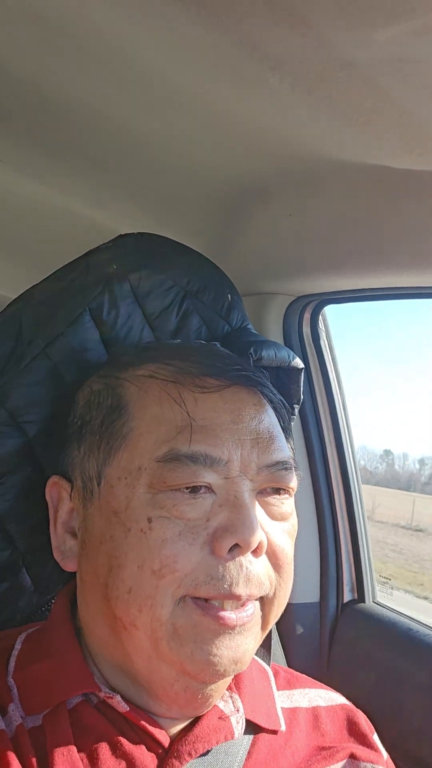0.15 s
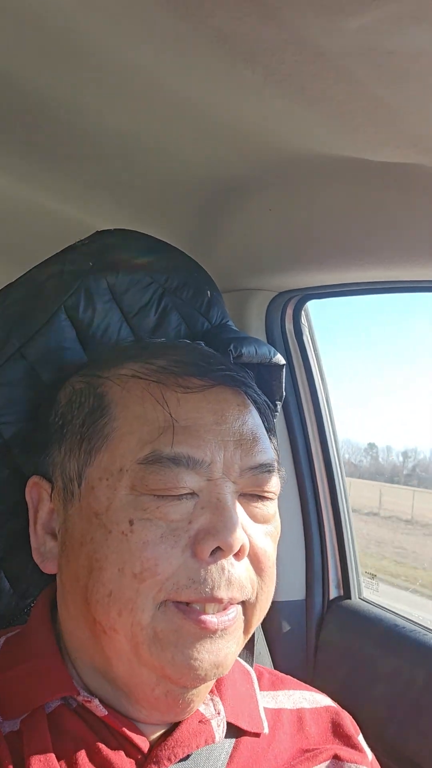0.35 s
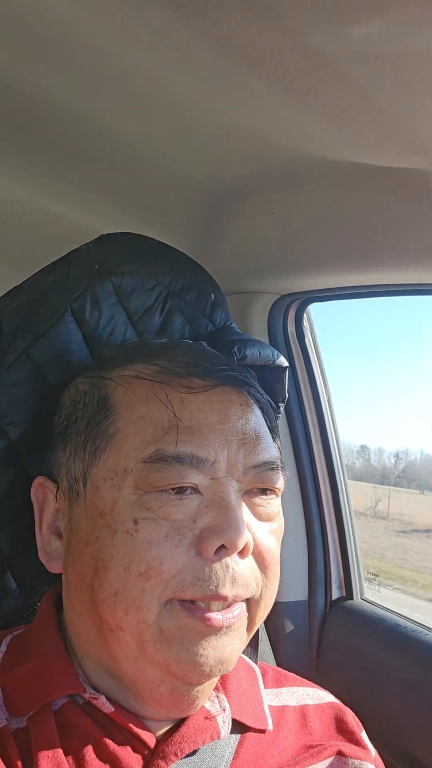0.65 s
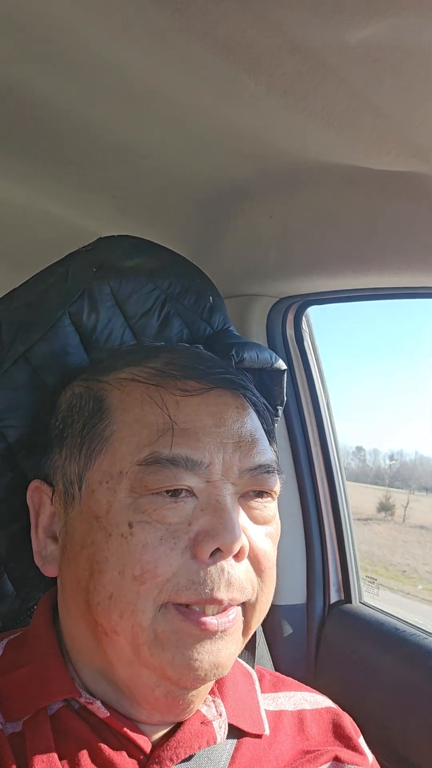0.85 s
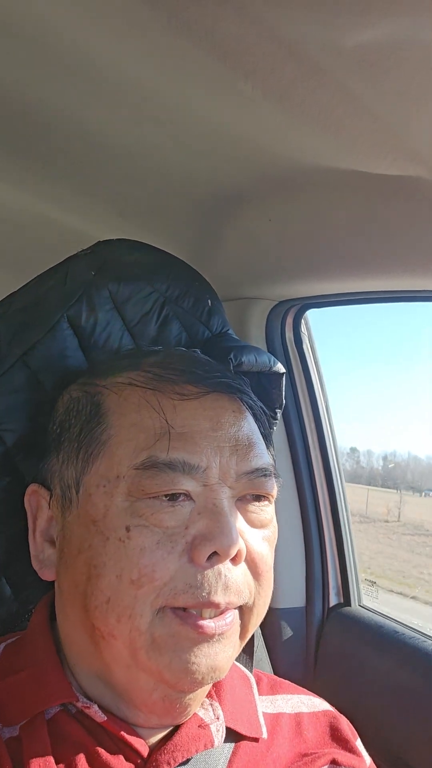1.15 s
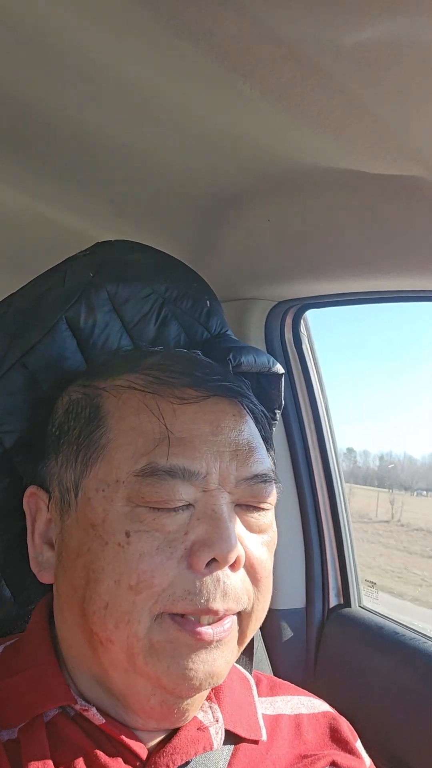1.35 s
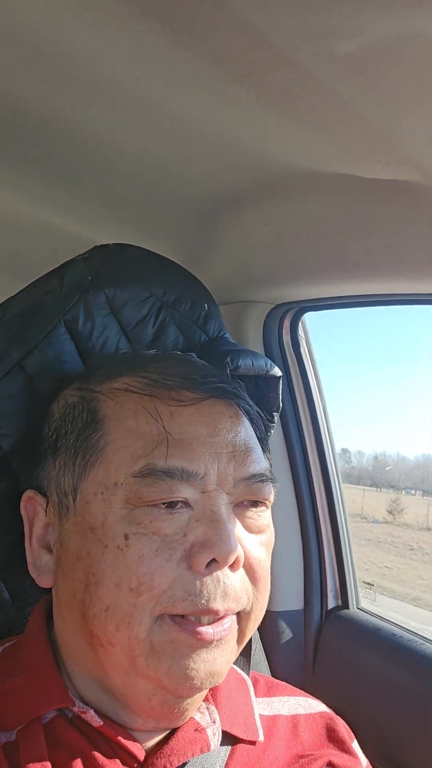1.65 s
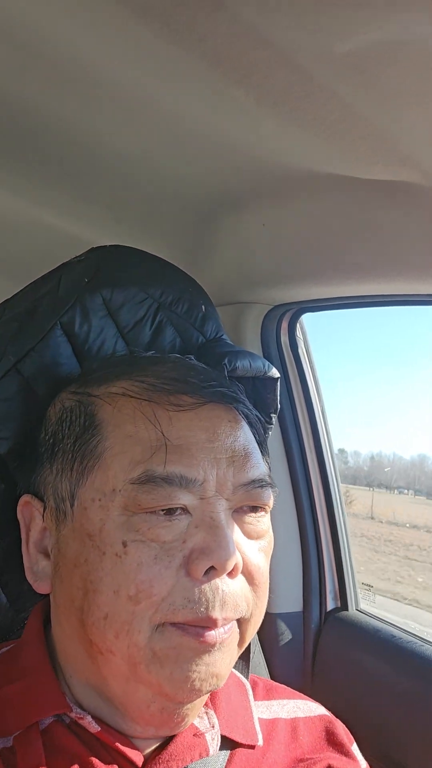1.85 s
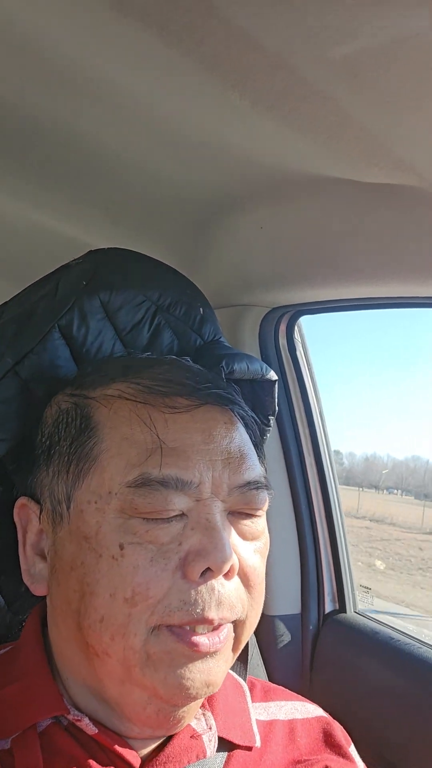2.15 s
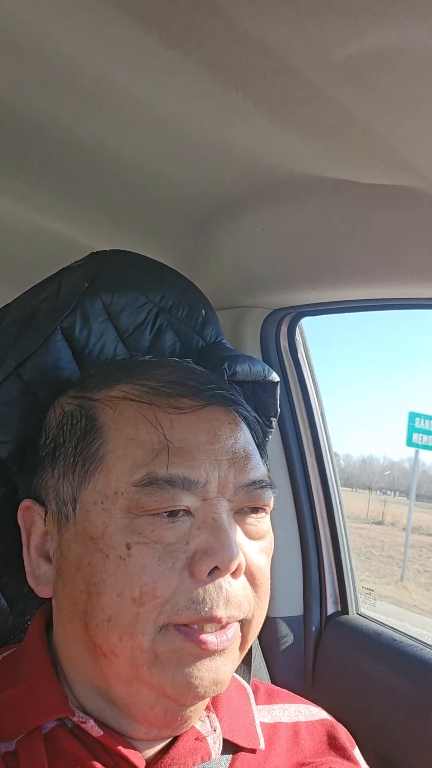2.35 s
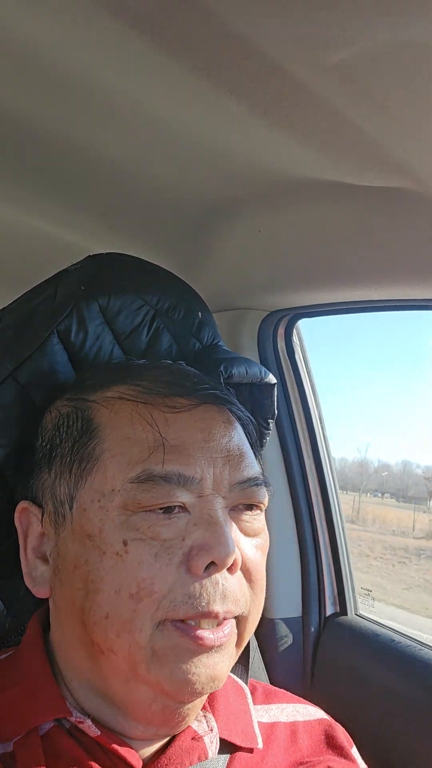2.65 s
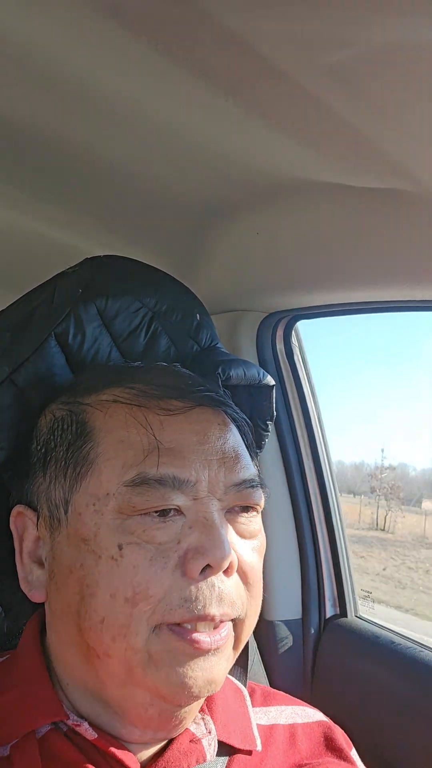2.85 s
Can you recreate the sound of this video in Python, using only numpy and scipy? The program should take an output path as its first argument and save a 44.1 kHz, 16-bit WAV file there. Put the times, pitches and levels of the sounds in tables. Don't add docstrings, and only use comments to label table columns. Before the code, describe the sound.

Deep cabin rumble of a cruising car runs throughout, fluttering with rapid soft bumps and floor thumps. The panel drone sinks around 0.75 s and returns by 1.5 s. Muffled tyre hiss and a very faint whistle sit above. Quiet plastic trim rustles and ticks, with a small knock at 0.36 s, a snap at 0.72 s, busier rattling from 2.4 s and a softer knock at 2.83 s.

```python
import sys
import numpy as np
from scipy import signal
from scipy.fft import rfft, irfft, next_fast_len
from scipy.io import wavfile
from scipy.ndimage import uniform_filter1d, map_coordinates

SR = 44100
rng = np.random.default_rng(int(sys.argv[2]) if len(sys.argv) > 2 else 0)


def wav_record(signal):
    frames = np.transpose(np.atleast_2d(signal))
    bounded = np.clip(frames, -1, 1)
    quanta = np.round(bounded * 32767).astype(np.int16)
    wavfile.write(sys.argv[1], SR, quanta)


def undo_db(level):
    steps = np.asarray(level, float) / 20
    return 10 ** steps


N = 132300

# [start_s, boom_level_db, drone_swell_db]
ROAD_LEVELS = [
    (0, -20, 0.5),
    (.75, -21.5, -3),
    (1.5, -21, 0),
    (2.1, -23, -1.5),
    (3, -22, 0),
]
# [pitch_hz, likeness (0 to 1)]
CABIN_LIKENESS = [(40, 0.98), (120, 0.97), (200, 0.89), (300, 1), (480, 0.71), (800, 0.17), (1300, 0.12),
                  (3000, .1)]
# [pitch_hz, level_db (per Hz)]
TRIM_SPECTRUM = [(2800, -6), (4900, -4.5), (6500, -7.5), (9150, -4.5), (9500, -22.5), (10600, -18.5),
                 (11600, -10), (15800, -12.5)]
# [pitch_hz, likeness (0 to 1)]
TRIM_LIKENESS = [(3000, 0.12), (15000, .05)]

BOUNCE_S, BOUNCE_DB = 0.0035, -9


def unit(x):
    return x / np.sqrt(np.mean(x ** 2) + 1e-20)


def along(points, hz):
    f, v = np.transpose(points)
    return np.interp(np.log(hz + 1), np.log(f + 1), v)


def curves(rows):
    s, *cols = np.transpose(rows)
    return [np.interp(np.arange(N) / SR, s, c) for c in cols]


def wobble(rate):
    return map_coordinates(rng.standard_normal(400), [np.arange(N) * rate / SR], mode="wrap")


def filtered(x, response):
    m = next_fast_len(N + SR // 2)
    return irfft(rfft(x, m) * response(np.fft.rfftfreq(m, 1 / SR)), m)[..., :N]


def closed(points, f):
    return undo_db(along(points, f)) * (f > points[0][0]) * (f < points[-1][0])


def modes(table, f):
    power = 0
    for centre, width, db in table:
        detuning = (f * f - centre * centre) / (f * width + 1e-9)
        power = power + undo_db(db) ** 2 / (1 + detuning ** 2) ** 2
    return np.sqrt(power)


def rush(gain, alike, patchy_db):
    z = signal.stft(rng.standard_normal((2, N)), nperseg=512)[2]
    field = uniform_filter1d(rng.standard_normal(z.shape[1:]), 6, axis=0)
    field = uniform_filter1d(field, 10, axis=1)
    pair = signal.istft(z * undo_db(patchy_db * unit(field)), nperseg=512)[1][:, :N]
    angle = lambda hz: np.arccos(np.clip(along(alike, hz), -1, 1)) / 2
    mid, side = filtered(pair, lambda hz: gain(hz) * [np.cos(angle(hz)), np.sin(angle(hz))])
    return unit(np.array([mid + side, mid - side]))


def steadied(x, floor):
    power = uniform_filter1d(np.mean(x ** 2, axis=0), size=SR // 8)
    return x / np.sqrt(np.abs(power) + floor)


def surges(rows, gain_db, min_s):
    t = np.arange(N) / SR
    out = np.zeros(N)
    for (s, length, db, hz), phase in zip(rows, rng.random(len(rows))):
        swell = np.exp(-((t - s) / (0.64 * max(length, min_s))) ** 2 / 2)
        out += undo_db(db + gain_db) * swell * np.sin(2 * np.pi * (hz * t + phase))
    return out


def clicks(times, peak_db, t60, rise_s, bounce_db=BOUNCE_DB):
    t, out = np.arange(900) / SR, np.zeros(N + 900)
    blow = lambda t: undo_db(-60 * np.abs(t) / t60) * np.clip(t / rise_s, 0, 1)
    shape = blow(t) + undo_db(bounce_db) * blow(t - BOUNCE_S)
    for s, db in zip(times, peak_db):
        out[int(s * SR):][:900] += undo_db(db) * shape * np.sign(rng.standard_normal(900))
    return out[:N]


def cabin_boom(boom_db):
    # [pitch_hz, width_hz, level_db]
    boom_modes = [(27.5, 15, -12.5), (32.5, 12, -6.5), (46, 6.1, -4), (61, 29, -10.5), (80, 15, -26),
                  (89, 13, -13)]
    boom = rush(lambda f: modes(boom_modes, f), CABIN_LIKENESS, patchy_db=0)
    return undo_db(boom_db) * steadied(boom, 0.037)


def road_bumps():
    # [start_s (middle), length_s, peak_db, pitch_hz]
    bump_rows = [(0.099, 0.022, -16, 52.7), (0.2, 0.039, -10, 41.2), (0.262, 0.027, -8.5, 48.8),
                 (0.313, 0.02, -17, 46.35), (0.541, 0.019, -12.5, 43.2), (0.605, 0.032, -7, 48.32),
                 (0.749, 0.029, -11.5, 49.6), (0.797, 0.017, -17.5, 44.5), (0.888, 0.035, -11.5, 50.3),
                 (0.979, 0.033, -12, 50.3), (1.04, 0.029, -17, 48.6), (1.103, 0.03, -18, 45.0),
                 (1.193, 0.007, -22, 52.0), (1.25, 0.082, -16, 47.1), (1.307, 0.053, -10.9, 44.5),
                 (1.426, 0.015, -20, 49.4), (1.488, 0.02, -10, 49.9), (1.567, 0.034, -7.5, 49.3),
                 (1.614, 0.022, -14, 50.3), (1.686, 0.025, -17.5, 49.73), (1.818, 0.038, -12.5, 47.5),
                 (1.932, 0.024, -11, 56.45), (2.142, 0.025, -16, 43.83), (2.24, 0.032, -10.5, 49.8),
                 (2.286, 0.013, -18, 49.44), (2.336, 0.058, -7, 49.5), (2.441, 0.042, -12.5, 41.78),
                 (2.53, 0.033, -14.5, 46.5), (2.601, 0.023, -10.5, 54.17), (2.654, 0.026, -10.5, 46.9),
                 (2.714, 0.038, -6.5, 49.35), (2.82, 0.022, -10.5, 50.2), (2.896, 0.06, -15, 46.1),
                 (2.981, 0.029, -7.5, 47.7)]
    # [start_s (middle), length_s, peak_db, pitch_hz]
    drum_rows = [(0.053, 0.03, -20.5, 135), (0.125, 0.02, -24.5, 137.3), (0.171, 0.022, -21, 127.1),
                 (0.31, 0.027, -15.5, 125.6), (0.42, 0.039, -20.5, 118.0), (0.488, 0.017, -29.5, 122.7),
                 (0.572, 0.022, -18.5, 126.7), (0.623, 0.017, -23, 117.9), (0.741, 0.017, -25.5, 120.8),
                 (0.859, 0.016, -19, 131), (0.905, 0.03, -16.5, 128.3), (0.972, 0.022, -21.5, 127.7),
                 (1.067, 0.018, -21.3, 128.7), (1.209, 0.025, -19, 131.8), (1.32, 0.027, -19, 128.8),
                 (1.38, 0.019, -19.5, 130.0), (1.546, 0.051, -19.5, 135), (1.605, 0.028, -21, 123.6),
                 (1.67, 0.018, -24, 128.4), (1.822, 0.018, -21, 131.2), (1.915, 0.018, -21, 122.3),
                 (2.066, 0.042, -20, 131.9), (2.136, 0.02, -22.0, 118), (2.241, 0.028, -17, 132.2),
                 (2.354, 0.032, -16, 130.8), (2.404, 0.014, -20.5, 126.3), (2.551, 0.016, -17.5, 135),
                 (2.728, 0.018, -20.5, 123), (2.813, 0.037, -14.5, 127.1), (2.922, 0.022, -16, 129.7)]
    return surges(bump_rows, -1.5, min_s=0.034) + surges(drum_rows, -2.5, min_s=0.028)


def panel_drone(swell_db):
    # [pitch_hz, width_hz, level_db]
    drone_modes = [(100.6, 14, -5), (124.7, 28, -6.5), (144, 25, -6.5), (175, 16, -8), (198.4, 13, -17),
                   (247.3, 58, -11.5), (328, 46.3, -12), (380, 10, -32), (544.6, 8, -22)]
    top_hz, level_db = 447, -25.5
    drone = rush(lambda f: modes(drone_modes, f) / (1 + (f / top_hz) ** 2), CABIN_LIKENESS, patchy_db=1.0)
    return undo_db(level_db + swell_db) * steadied(drone, 0.12)


def tyres(boom_db):
    # [pitch_hz, level_db (per Hz)]
    hiss_spectrum = [(210, -21), (350, -2.5), (507, -15.5), (556, -13), (791, -21), (1120, -21.5),
                     (2100, -32), (2540, -35.5), (3050, -46), (3960, -76), (6710, -120)]
    # [pitch_hz, width_hz, level_db]
    groove_modes = [(2334, 130, -2.5), (2427, 23, 5), (2612, 190, -1), (1120, 150, 3.5), (1296, 23, 7.5)]
    # [pitch_hz, phase_rad]
    groove_phase = [(2250, -1.5), (2340, -2), (2450, 2.2), (2570, 1.5), (2700, 3.5)]
    hiss_db, groove_db = -39, -58
    hiss = rush(lambda f: closed(hiss_spectrum, f), CABIN_LIKENESS, patchy_db=0.88)
    pipes = rush(lambda f: modes(groove_modes, f), [(1200, 0.81), (2400, 0.53)], patchy_db=1.5)
    pipes = filtered(pipes, lambda f: [f * 0 + 1, np.exp(1j * along(groove_phase, f))])
    tyre_db = 0.034 * (boom_db - boom_db.mean()) + 0.19 * wobble(3.1)
    return undo_db(tyre_db) * (undo_db(hiss_db) * hiss + undo_db(groove_db) * pipes)


def knocks():
    # [start_s, level_db]
    knock_rows = [
        (.3566, -40),
        (2.829, -46),
    ]
    # [pitch_hz, level_db, t60_s]
    panel_modes = [(4350, -4, .012), (4750, -2, .013), (5100, 1, .016), (5400, 2, .016), (5800, -3, .011),
                   (6900, -6, .007), (8000, -12, .006), (12200, -10, .005)]
    t = np.arange(N) / SR
    out = np.zeros((2, N))
    for s, db in knock_rows:
        for late, loss_db in ((0, 0), (BOUNCE_S, BOUNCE_DB)):
            u = np.clip(t - s - late, 0, 0.05)
            rise = 1 - np.exp(-u / 0.0004)
            phases = rng.random((len(panel_modes), 2, 1))
            for (hz, mode_db, t60), phase in zip(panel_modes, phases):
                decay = undo_db(db - 10.5 + loss_db + mode_db - 60 * u / t60)
                out += decay * rise * np.sin(2 * np.pi * (hz * u + phase))
    return out


def ticks():
    # [start_s, peak_db]
    tick_rows = [(0.1988, -52), (0.2628, -60), (0.4748, -62.5), (0.61, -56), (0.94, -59), (0.98, -54),
                 (1.0136, -58.5), (1.1558, -53), (1.1794, -60.5), (1.2084, -57.5), (1.253, -61.5),
                 (1.5147, -57), (1.5554, -56.5), (1.5904, -59), (1.6232, -56), (1.6571, -56), (1.7863, -61),
                 (1.8203, -55.5), (1.855, -56.5), (2.2488, -59.5), (2.359, -61.5), (2.39, -56.5),
                 (2.4267, -55), (2.5592, -60), (2.6456, -52), (2.6757, -51), (2.7095, -55), (2.9427, -56),
                 (2.9676, -49)]
    s, db = np.transpose(tick_rows)
    taps = np.array([clicks(s, db - 3.5, t60=0.012, rise_s=0.001) for _ in range(2)])
    colour = lambda f: 0.26 + 6.0 * modes([(5000, 1500, 0)], f)
    return filtered(taps, lambda f: closed(TRIM_SPECTRUM, f) * colour(f) * (f > 3600))


def snaps():
    # [start_s, peak_db]
    snap_rows = [(.1206, -63), (.2723, -64), (.357, -55), (.695, -62), (.7208, -50), (.7462, -53),
                 (1.1545, -62), (1.799, -66), (1.855, -66), (2.1425, -54), (2.554, -64), (2.671, -56),
                 (2.707, -63), (2.8285, -62)]
    s, db = np.transpose(snap_rows)
    pair = [clicks(s, db + 4 + lean_db, t60=0.006, rise_s=0.0003, bounce_db=-18) for lean_db in (3, -3)]
    return filtered(np.array(pair), lambda f: 1 / (1 + (7000 / (f + 1)) ** 4))


def clip_rings():
    # [start_s, level_db]
    ring_rows = [
        (.125, -66),
        (2.43, -67),
        (2.556, -63),
        (2.675, -58),
    ]
    hz, t60 = 7500, 0.045
    t = np.arange(N) / SR
    envelope = np.zeros(N)
    for s, db in ring_rows:
        envelope += undo_db(db - 60 * np.abs(t - s) / t60) * np.clip((t - s) / 0.002, 0, 1)
    return envelope * np.sin(2 * np.pi * hz * t + 1.5 * wobble(80))


def jolts():
    # [start_s, length_s]
    jolt_spans = [(.05, .05), (.105, .065), (.26, .07), (.352, .035), (.425, .035), (.595, .075),
                  (.715, .045), (.9, .05), (.97, .06), (1.15, .085), (1.38, .1), (1.545, .05), (1.655, .13),
                  (1.81, .06), (2.105, .06), (2.238, .09), (2.355, .025), (2.423, .04), (2.5, .04),
                  (2.545, .04), (2.643, .04), (2.705, .015), (2.73, .045), (2.822, .025), (2.862, .045),
                  (2.963, .04)]
    jolt_levels = [-82, -76, -82.5, -80, -83, -80.5, -80.5, -87.5, -85, -78.5, -85, -82.5, -82, -89, -80.5,
                   -78, -77.5, -77, -75, -76.5, -74.5, -74, -77.5, -73, -73, -80]
    attack_s, release_s, idle_db = 0.005, 0.012, -90
    t = np.arange(N) / SR
    power = np.full(N, undo_db(idle_db) ** 2)
    for (s, length), db in zip(jolt_spans, jolt_levels):
        attack = np.clip((t - s) / attack_s, 0, 1)
        release = np.exp(-np.clip(t - s - length, 0, 3) / release_s)
        power += undo_db(db) ** 2 * attack * release
    return np.sqrt(power) * undo_db(1.8 * wobble(25) + 1.8 * wobble(60))


def rustle(jolt):
    return jolt * undo_db(5) * rush(lambda f: closed(TRIM_SPECTRUM, f), TRIM_LIKENESS, patchy_db=1.2)


def patter(jolt):
    puffs_per_s, puff_s, spread_db = 220, 0.0011, 2.5
    strength = undo_db(spread_db * np.clip(rng.standard_normal(N), -2, 2))
    starts = (rng.random(N) < puffs_per_s / SR) * strength
    decay = np.exp(-np.arange(2000) / SR / puff_s)
    puffs = signal.fftconvolve(starts, decay)[:N] * rng.standard_normal((2, N))
    return jolt * undo_db(1) * unit(filtered(puffs, lambda f: closed(TRIM_SPECTRUM, f)))


def creak():
    # [middle_s, half_length_s, pitch_hz, level_db]
    creak_event = (.08, .03, 3300, -67)
    s, half, hz, db = creak_event
    swell = np.exp(-((np.arange(N) / SR - s) / half) ** 2)
    return undo_db(db) * swell * rush(lambda f: modes([(hz, 350, 0)], f), TRIM_LIKENESS, patchy_db=2)


def still_air():
    # [pitch_hz, level_db (per Hz)]
    air_spectrum = [(2700, -4.5), (3200, -0.5), (4500, -9.5), (6500, -15), (9200, -15.5), (9700, -30),
                    (12000, -22.5), (15800, -29.5)]
    air = rush(lambda f: closed(air_spectrum, f), TRIM_LIKENESS, patchy_db=1.7)
    return undo_db(-73 + 1.3 * wobble(12)) * air


def scene():
    boom_db, swell_db = uniform_filter1d(curves(ROAD_LEVELS), size=400)
    road = cabin_boom(boom_db) + road_bumps() + panel_drone(swell_db) + tyres(boom_db)
    jolt = jolts()
    contacts = knocks() + ticks() + snaps() + clip_rings()
    rubbing = rustle(jolt) + patter(jolt) + creak()
    return road + contacts + rubbing + still_air()


def top_cut(x):
    return signal.sosfilt(signal.butter(12, 15830, fs=SR, output="sos"), x)


def record(dry):
    # [pitch_hz, level_db]
    port_lean = [(30, 2.3), (85, 1.2), (230, 1.8), (320, 3.8), (500, -.5), (1200, -2.5), (1800, -7),
                 (3500, -6.5)]
    # [pitch_hz, level_db]
    right_colour = [(3500, 0), (4700, 8.5), (5550, 7), (6200, 5.5), (8600, -2.5), (9600, -15.5),
                    (11500, -2.5), (15000, -0.5)]
    # [pitch_hz, phase_rad]
    right_lead = [(30, .4), (60, .25), (120, .13), (300, .06), (500, -.1)]
    right = lambda f: undo_db(along(right_colour, f)) * np.exp(1j * along(right_lead, f))
    balance = lambda f: undo_db(along(port_lean, f) * np.array([[0.5], [-0.5]]))
    ports = filtered(dry, lambda f: balance(f) * [f * 0 + 1, right(f)])
    return top_cut(ports)


dry = scene()
out = record(dry)
wav_record(out)
```